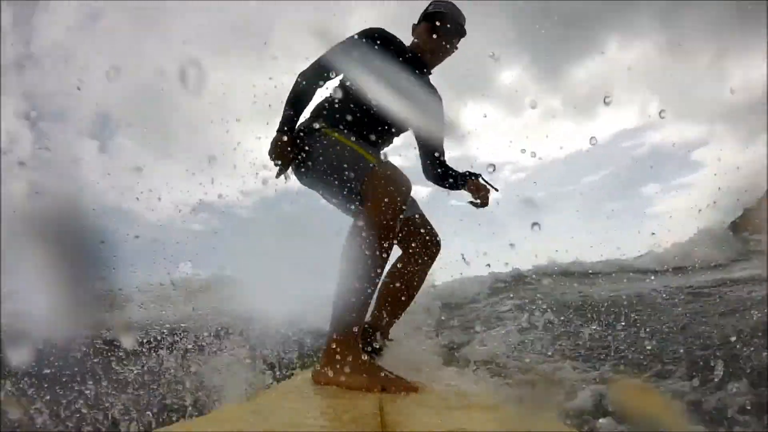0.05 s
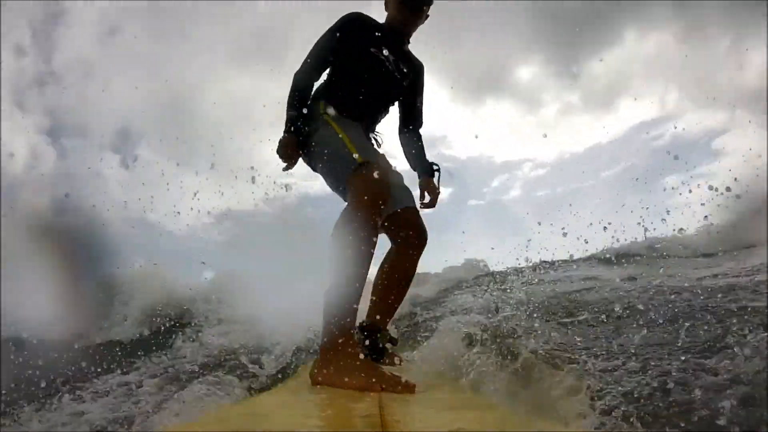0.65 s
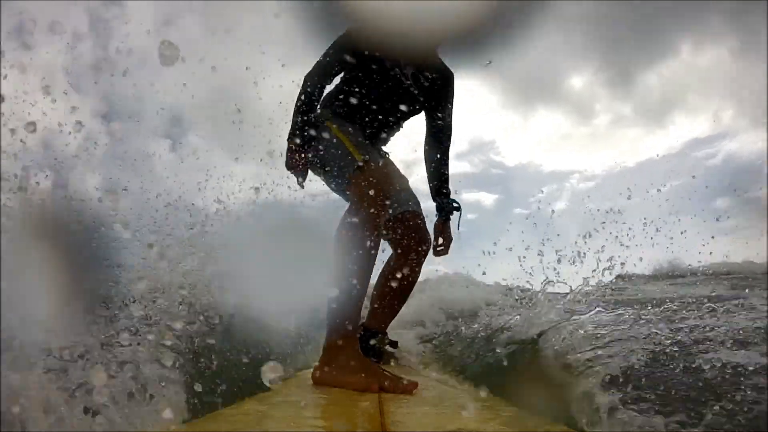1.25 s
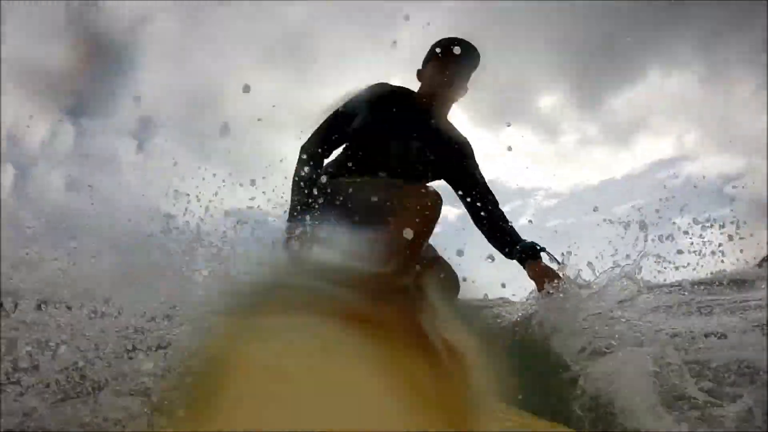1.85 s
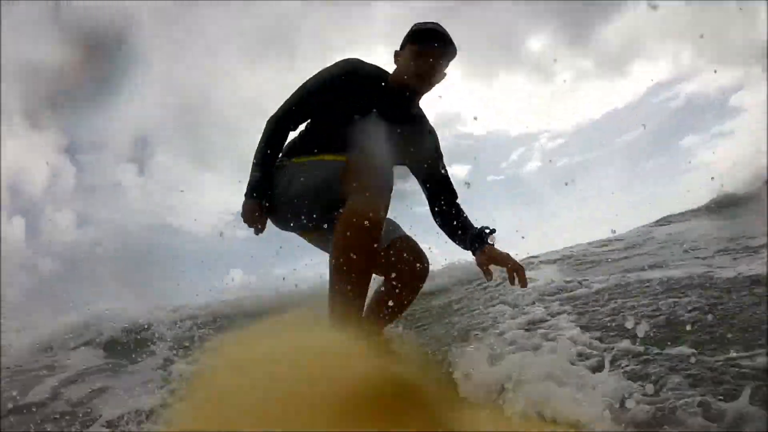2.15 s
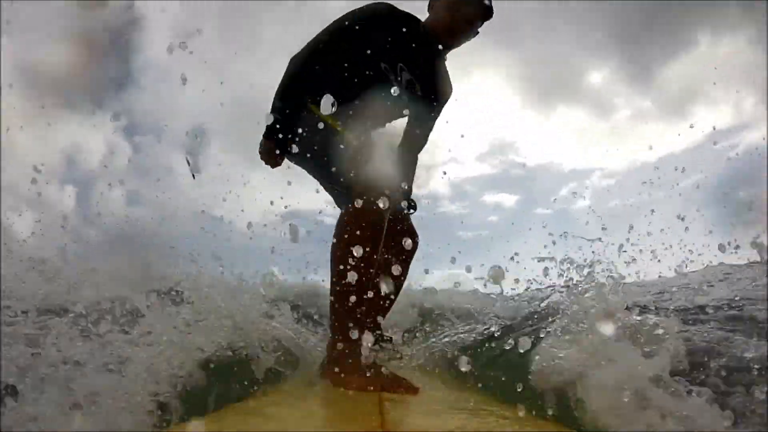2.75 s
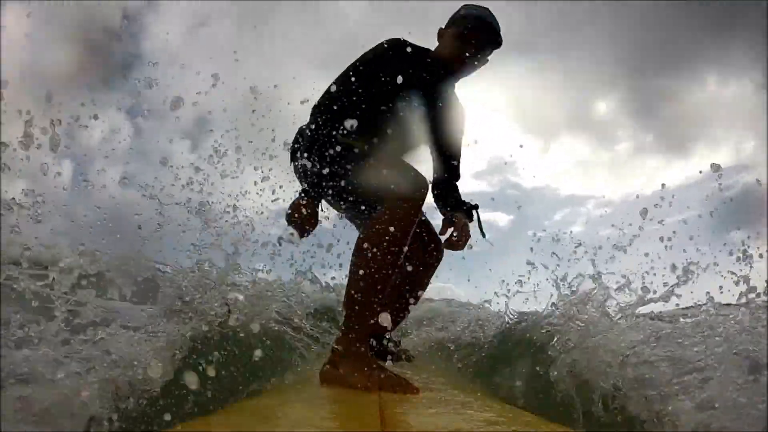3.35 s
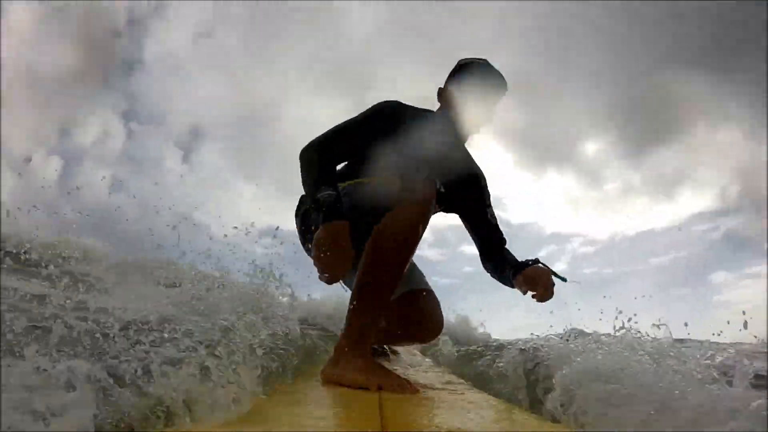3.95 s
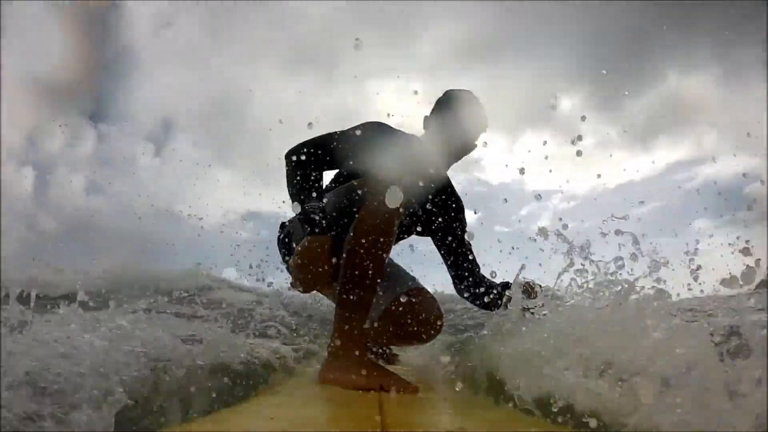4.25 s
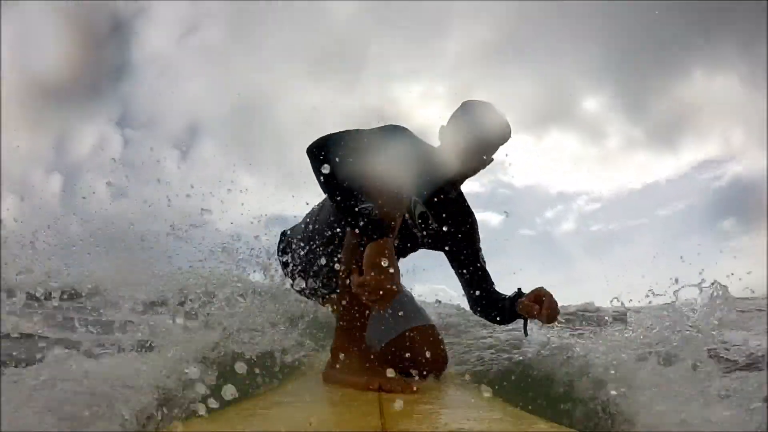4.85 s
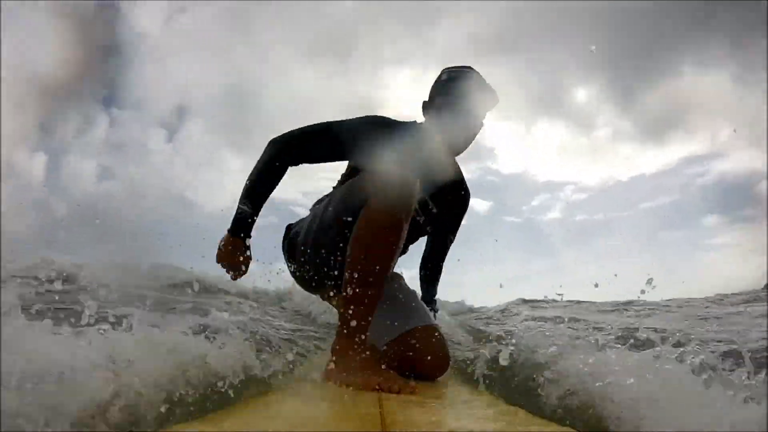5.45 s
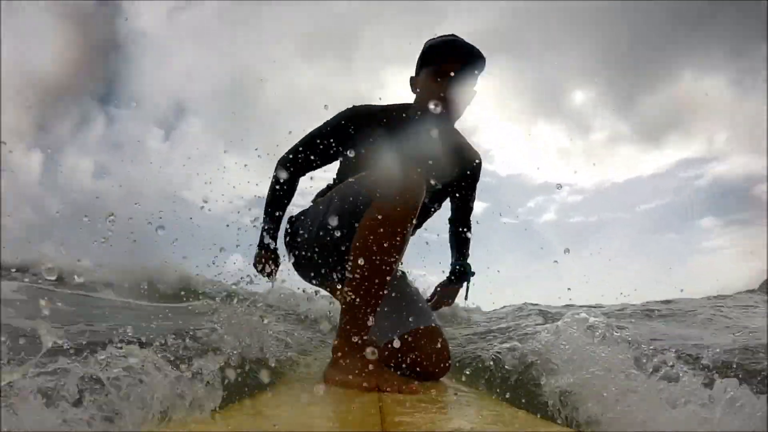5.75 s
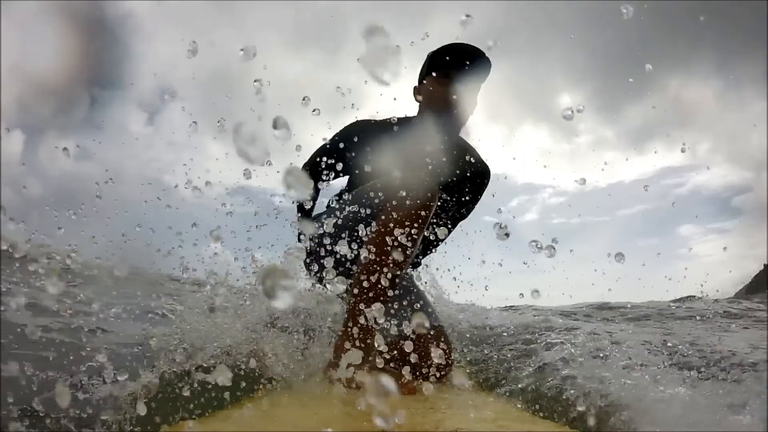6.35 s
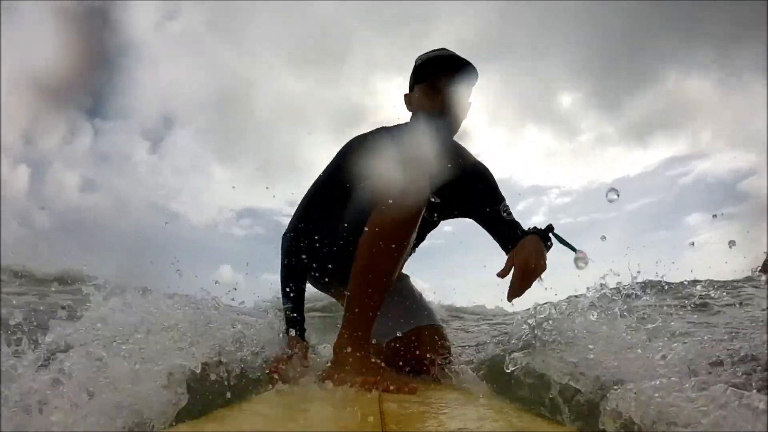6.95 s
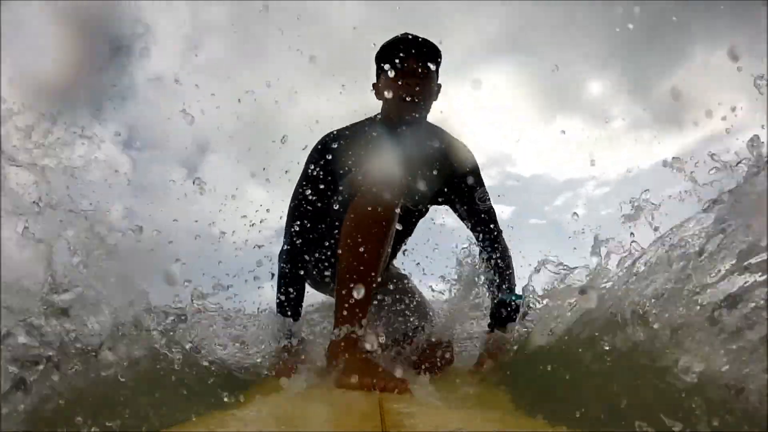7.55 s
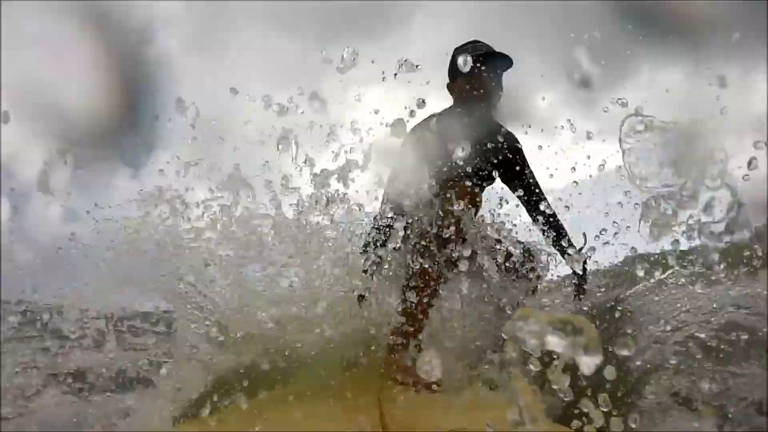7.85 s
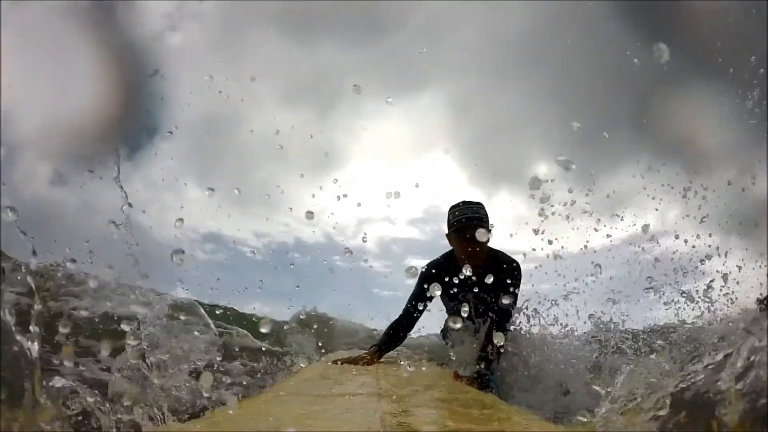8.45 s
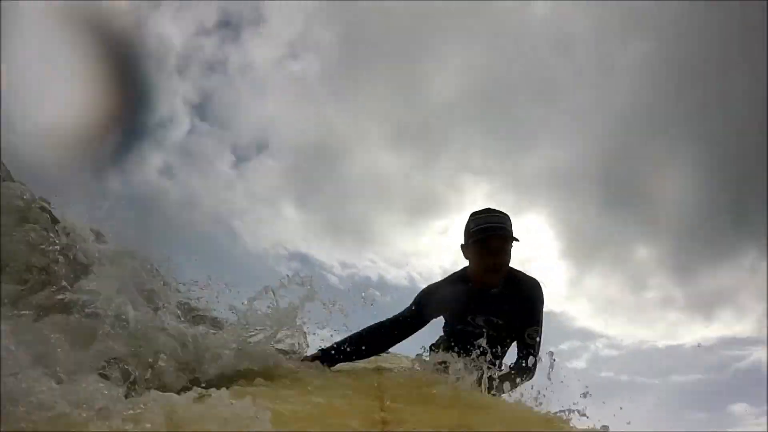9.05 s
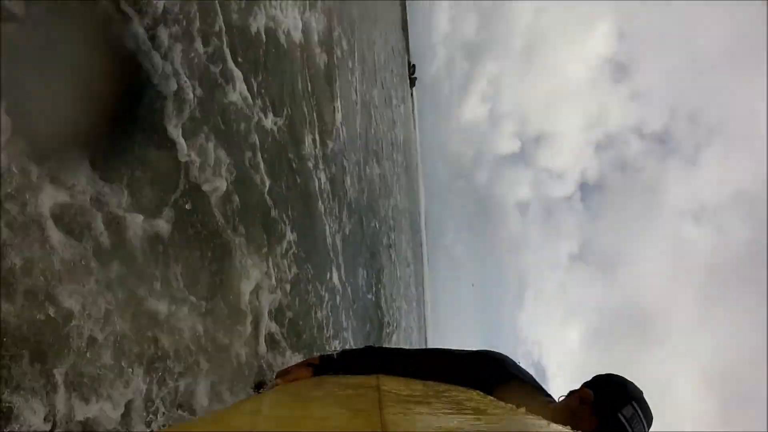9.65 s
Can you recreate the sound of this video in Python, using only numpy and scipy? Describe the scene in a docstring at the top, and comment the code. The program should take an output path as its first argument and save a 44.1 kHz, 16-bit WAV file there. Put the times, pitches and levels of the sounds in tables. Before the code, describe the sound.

Deep wind rumble and uneven booming shake a microphone mounted on the front of a surfboard at sea. Whitewater washes all around, swelling each time the nose digs in, with wet slaps, dull knocks and pattering spray. The surges come closer together from the middle on. Late in the ride, loud drops shower the microphone, a heavy thump follows, and water gurgles at the nose.

```python
"""Surfboard riding whitewater

Heard from a waterproof camera on the board's nose. Each time the nose ploughs in, a bow wave
rushes and churns. Small waves slap the board, and the shaking makes the camera mount boom near
100 Hz. Wind rumbles, spray ticks on the camera case, and now and then a sheet of water thumps the
microphone opening and muffles it. At the end, spray showers the case and water gurgles at the nose."""
import sys
import numpy as np
from scipy import signal
from scipy.fft import rfft, irfft, next_fast_len
from scipy.io import wavfile
from scipy.ndimage import uniform_filter1d

SR = 44100
rng = np.random.default_rng(int(sys.argv[2]) if len(sys.argv) > 2 else 0)


def dump(signal):
    """Clip the signal to [-1, 1] and save it as 16-bit WAV at the path in sys.argv[1]."""
    limited = np.clip(np.atleast_2d(signal).T, -1, 1)
    pcm = np.round(limited * 32767).astype(np.int16)
    wavfile.write(sys.argv[1], SR, pcm)


N = 428652
T = np.arange(N) / SR
TOP_HZ = 15200  # upper edge of the treble


def gain_of(db):
    """Turns decibels into a number to multiply a sound by."""
    return 10 ** (np.asarray(db) / 20)


def unit_rms(x):
    """Scales a signal so that its average strength (rms) is 1."""
    return x / np.sqrt(np.mean(x ** 2) + 1e-20)


def follow(curve, column=1):
    """Joins the dots of one dB column, giving a gain for every sample."""
    rows = np.array(curve)
    return gain_of(np.interp(T, rows[:, 0], rows[:, column]))


def add(mix, start, sound):
    """Mixes a sound in at a start time in seconds."""
    part = mix[max(round(start * SR), 0):][:len(sound)]
    part += sound[:len(part)]


def drift(rate_hz):
    """A random wobble, no faster than about the given rate."""
    hz = np.fft.rfftfreq(N, 1 / SR)
    return unit_rms(irfft(rfft(rng.standard_normal(N)) * np.exp(-(hz / rate_hz) ** 2), N))


def surges(rows, rise_s, fall_s, growth_db=0):
    """Gain for a series of pushes: each builds up, changes by growth_db as it lasts, then dies away."""
    t, power = T[::64], 0
    for start, length, db in rows:
        age = t - start
        fades = np.exp(np.minimum(age, 0) / rise_s - np.maximum(age - length, 0) / fall_s)
        progress = np.clip(age / length, 0, 1)
        power = power + (fades * gain_of(db + growth_db * (progress - 1))) ** 2
    return np.interp(T, t, np.sqrt(power))


def focus(spectrum, centre_hz, slope_db):
    """Turns a spectrum down on both sides of a centre, by slope_db at one octave away."""
    return [(f, db - slope_db * np.log2(f / centre_hz) ** 2) for f, db in spectrum]


# pitches that the camera case boosts or weakens: f/Hz, width/Hz, level/dB
CASE_RESONANCES = [(351.6, 29.2, 8), (388.5, 34, -3.5), (495, 30, 1), (1141, 64, -4.5), (1400, 180, 1),
                   (3830, 83, -1), (4070, 320, 3), (5450, 160, -0.5), (6270, 410, 4.5), (7200, 430, 2)]
def colour(x, spectrum):
    """Gives a sound the tone of a spectrum, as heard through the case, at rms 1."""
    size = next_fast_len(len(x))
    hz = np.fft.rfftfreq(size, 1 / SR)
    points_hz, points_db = np.transpose(spectrum)
    tone_db = np.interp(np.log(hz + 1), np.log(points_hz), points_db)
    case_db = sum(db * np.exp(-.5 * ((hz - f) / width) ** 2) for f, width, db in CASE_RESONANCES)
    return unit_rms(irfft(rfft(x, size) * gain_of(tone_db + case_db), size)[:len(x)])


def rumble(spectrum, force, settle_s, steadiness):
    """Deep noise, evened out so that its loudness keeps close to the force driving it."""
    noise = colour(rng.standard_normal(N), spectrum)
    power = uniform_filter1d(abs(signal.hilbert(noise)) ** 2, size=int(settle_s * SR))
    return unit_rms(noise / (power + 0.039) ** (steadiness / 2)) * force


# air flowing over the moving camera: t/s, level/dB
AIRFLOW = [(0.0, -26.5), (1.43, -27.5), (2.0, -32), (2.54, -21), (2.71, -28.5), (3.19, -23), (3.65, -32.5),
           (4.11, -24), (5.25, -33.5), (5.49, -28), (7.23, -28), (7.58, -31), (8.28, -27.5), (8.47, -37),
           (9.12, -31.5), (9.37, -31), (9.72, -25.5)]
# gusts across the microphone opening: t/s, length/s, level/dB
WIND_GUSTS = [(0.27, 0.29, -29.5), (0.96, 0.099, -21.5), (1.52, .11, -25.5), (2.34, .13, -21.5),
              (2.95, .1, -25), (3.84, 0.17, -19.5), (4.6, 0.068, -26), (8.08, 0.36, -38), (8.82, .03, -31),
              (9.45, 0.34, -31.5)]
# tone of the wind: f/Hz, level/dB
WIND_TONE = [(10, -26), (22, -15.5), (38, -1.5), (55, 0.5), (70, 3.5), (110, -14), (300, -44.5),
             (1500, -92.5)]
def wind(airflow_db=-6, swirl_db=5.2):
    """Moving air rumbles in the microphone opening, swelling with every swirl and gust."""
    swirls = gain_of(airflow_db + swirl_db * drift(rate_hz=7.5)) * follow(AIRFLOW)
    gusts = surges(WIND_GUSTS, rise_s=0.012, fall_s=0.035)
    return rumble(WIND_TONE, np.hypot(gusts, swirls), settle_s=0.098, steadiness=0.92)


def bubbles(low_hz, high_hz, per_s, cycles, spread_db, pitches=17):
    """A swarm of bubbles: each rings, rises a little in pitch and dies away."""
    out = np.zeros(N)
    for hz in np.geomspace(low_hz, high_hz, pitches):
        progress = np.linspace(0, 1, int(cycles * SR / hz) + 8)
        envelope = np.exp(-4.5 * progress) * (1 - np.exp(-25 * progress))
        ring = np.sin(2 * np.pi * cycles * (progress + 0.1 * progress ** 2)) * envelope
        when, size, lottery = rng.random((900, 3)).T
        born = lottery < per_s * N / SR / pitches / len(lottery)
        strength = gain_of(spread_db * np.minimum(-np.log(1 - size), 3.5))  # a few are much louder
        births = np.bincount((when[born] * N).astype(int), strength[born], N)
        out += signal.oaconvolve(births, ring)[:N]
    return unit_rms(out)


# the foaming sea all around, also heard in whitewater(): t/s, wash level/dB, foam level/dB
BROKEN_SEA = [(0.0, -39.5, -55.5), (0.24, -40.5, -55.5), (1.87, -41, -57.5), (3.14, -38.5, -56.5),
              (3.74, -43.5, -58.5), (4.09, -43, -72), (4.22, -40.5, -51), (4.55, -49, -60.5),
              (6.09, -36.5, -53), (6.36, -42.5, -53.5), (6.98, -37.5, -57), (7.28, -39.5, -53),
              (7.47, -48, -59), (8.28, -37, -49), (8.47, -41.5, -54.5), (9.18, -42, -57), (9.72, -51, -55)]
def droplets(level_db=-20):
    """Stray droplets thrown up by the foam tick on the case all the time."""
    ticks = bubbles(6000, 14000, per_s=60, cycles=11, spread_db=1.5)
    tone = [(3000, -9), (6500, -11), (8500, -11), (13000, -13.5)]
    return gain_of(level_db) * colour(ticks, tone) * follow(BROKEN_SEA, column=2)


# single drops hitting the case: t/s, peak level/dB, f/Hz
DROP_HITS = [(0.7607, -50, 8770), (0.818, -44, 8300), (1.4457, -44, 8400), (1.4684, -41.5, 8400),
             (1.5319, -43, 12700), (1.8973, -44, 8800), (3.3286, -33, 4150), (3.4988, -50, 13510),
             (3.5828, -43, 7860), (4.6109, -41, 5400), (5.2794, -30.5, 7800), (5.4043, -37, 8760),
             (5.9514, -23, 1890), (6.379, -23.5, 2230), (7.75, -32.5, 6100), (7.8276, -29, 7900),
             (7.864, -22, 7200), (7.882, -24, 4560), (8.634, -12, 1990), (8.6427, -9, 2120),
             (8.6472, -10.5, 1950), (8.6607, -13, 1930), (8.766, -18, 4570), (8.9563, -46.6, 8700),
             (9.1049, -52, 9110), (9.3967, -38, 9900), (9.4242, -45, 9050)]
def drops(ring_s=0.0013, rise_s=0.00022, splash=0.61):
    """A drop pings on the case and scatters in a tiny splash around the same pitch."""
    out, t = np.zeros(N), np.arange(800) / SR
    envelope = np.exp(-t / ring_s) * (1 - np.exp(-(t / rise_s) ** 2))
    for start, db, hz in DROP_HITS:
        tone = [(hz / 10, -50), (hz / 2, -20), (hz, 0), (hz * 2, -22), (hz * 10, -65)]
        scatter = colour(rng.standard_normal(len(t)), tone)
        ping = (np.sin(2 * np.pi * hz * t) + splash * scatter) * envelope
        add(out, start, gain_of(db) * ping / abs(ping).max())
    return out


# spray landing on the case: t/s, length/s, level/dB, centre f/Hz, drops per second
SPRAY_SHOWERS = [(1.124, 0.064, -36.5, 2460, 5700), (3.292, .09, -40.5, 2930, 17000),
                 (4.111, 0.05, -37.5, 3120, 12000), (6.767, 0.046, -41, 2900, 10000),
                 (7.32, .06, -38, 2800, 9100), (7.79, 0.16, -42, 6240, 1100),
                 (7.901, 1.34, -59.5, 5670, 880), (8.645, 0.13, -27, 2320, 12800),
                 (8.653, 0.11, -48.5, 10400, 10000), (8.738, 0.11, -41, 4630, 1500),
                 (9.371, 0.065, -44.5, 7600, 2300)]
# tone of the spray: f/Hz, level/dB
SPRAY_TONE = [(200, 34.5), (1300, 3), (2300, 3), (3600, -7), (7500, -18), (9000, -29), (12000, -18),
              (15000, -35)]
def showers(spread_db=3, rise_s=0.000069, tick_s=0.00025):
    """A cloud of drops sweeps over the case, swelling and fading; each ticks at its own pitch."""
    out, t = np.zeros(N), np.arange(200) / SR
    envelope = np.exp(-t / tick_s) * (1 - np.exp(-t / rise_s))
    for start, length, db, hz, per_s in SPRAY_SHOWERS:
        when, size, pitch = rng.random((2048, 3))[:int(per_s * length)].T[:, :, None]
        strength = np.sin(np.pi * when) * gain_of(spread_db * np.minimum(-np.log(1 - size), 3))
        ticks = strength * np.sin(2 * np.pi * pitch * TOP_HZ * t) * envelope
        samples = ((when * length + t) * SR + .5).astype(int)
        patter = np.bincount(samples.ravel(), ticks.ravel())
        add(out, start, gain_of(db) * colour(patter, focus(SPRAY_TONE, hz, slope_db=3.5)))
    return out


# pockets of air ringing under the nose: t/s, length/s, level/dB, f/Hz
AIR_POCKETS = [(1.398, 0.036, -28, 913), (1.417, 0.012, -19.5, 500), (1.865, 0.028, -42, 353),
               (2.614, 0.009, -17, 1690), (2.871, 0.074, -30, 955), (2.95, 0.043, -29.5, 413),
               (4.445, 0.0046, -23.5, 1970), (4.474, 0.0074, -25, 1540), (6.116, 0.015, -17, 2110),
               (6.466, 0.013, -19, 1266), (7.352, 0.043, -24, 240), (7.607, 0.051, -28.5, 254),
               (7.722, 0.012, -22.5, 933), (7.932, 0.059, -26.5, 685), (8.353, 0.074, -28.5, 226),
               (9.033, 0.027, -28.5, 720), (9.034, 0.027, -23.5, 1410), (9.085, 0.077, -33.5, 516),
               (9.161, 0.035, -42, 880), (9.24, 0.15, -28.5, 513), (9.343, 0.05, -27, 750),
               (9.524, 0.013, -22, 597)]
def gurgles(level_db=-1, glide=0.035, wobble=0.06, rough_db=4.5):
    """Trapped air sings a short, ragged note that rises as it nears the surface."""
    out = np.zeros(N)
    waver = drift(rate_hz=450)
    shudder = gain_of(rough_db * drift(rate_hz=710))
    for start, length, db, hz in AIR_POCKETS:
        progress = np.linspace(0, 1, int(length * SR))
        samples = int(start * SR) + np.arange(len(progress))
        pitch = hz * (1 + glide * progress + wobble * waver[samples])
        swell = np.sin(np.pi * progress ** 0.5) ** 2 * unit_rms(shudder[samples])
        add(out, start, gain_of(db + level_db) * swell * np.sin(2 * np.pi * np.cumsum(pitch) / SR))
    return out


# small waves slapping the nose: t/s, length/s, level/dB, centre f/Hz
WAVE_SLAPS = [(0.364, 0.021, -26.5, 1000), (0.424, 0.025, -26, 1440), (0.995, 0.026, -23.5, 1190),
              (1.383, 0.046, -25.5, 1010), (1.506, 0.02, -26.5, 1160), (1.527, 0.027, -32, 860),
              (1.674, 0.036, -35, 1260), (1.866, 0.029, -34.5, 840), (2.272, 0.0061, -22.5, 1010),
              (2.283, 0.028, -23, 885), (2.352, 0.02, -24.5, 1000), (2.414, 0.015, -30.5, 1190),
              (2.452, 0.02, -26, 1190), (2.501, 0.019, -30, 1290), (2.957, 0.017, -28.5, 780),
              (3.283, 0.021, -22.5, 1430), (3.354, 0.016, -25, 1220), (3.7, 0.013, -30, 1030),
              (5.838, 0.028, -27.5, 1430), (6.159, 0.016, -29.5, 1570), (6.244, 0.013, -25.5, 1200),
              (6.708, 0.018, -31, 1060), (6.818, 0.01, -24.5, 1210), (7.329, 0.023, -24, 1310),
              (7.434, 0.015, -18, 1030), (7.722, 0.0095, -32, 1050), (7.835, 0.0047, -27, 1350),
              (7.934, 0.011, -23, 1110), (8.299, 0.034, -25, 1480), (8.353, 0.017, -26, 1370),
              (8.806, 0.02, -27, 516), (9.029, 0.0094, -33, 1290), (9.378, 0.029, -32, 1330),
              (9.516, 0.0041, -31.5, 940), (9.524, 0.025, -35, 810), (9.647, 0.031, -33.5, 1070)]
# tone of a slap: f/Hz, level/dB
SLAP_TONE = [(100, -18.5), (280, 2.5), (600, -4.5), (1400, -5), (2200, -5.5), (3200, -14), (5000, -21.5),
             (8000, -22), (15000, -63.5)]
def slaps(level_db=-1, rise_s=0.0012, stop_s=0.0018, grain_db=3, wet_db=-13, wet_s=0.022):
    """A slap is a tight bunch of tiny hits that stops quickly and leaves a short, wet tail."""
    out, t = np.zeros(N), np.arange(4096) / SR
    for start, length, db, hz in WAVE_SLAPS:
        noise, sizes = rng.standard_normal((2, len(t)))
        hits = noise * gain_of(grain_db * np.repeat(sizes[::64], 64))
        burst = colour(hits, focus(SLAP_TONE, hz, slope_db=4.5))
        after = np.maximum(t - length, 0)
        tail = np.maximum(np.exp(-after / stop_s), gain_of(wet_db) * np.exp(-after / wet_s))
        burst *= np.minimum(t / rise_s, 1) * tail
        burst /= np.std(burst[:int(length * SR) + 60])
        add(out, start - rise_s / 2, gain_of(db + level_db) * burst)
    return out


# water covering the microphone: t/s, thump level/dB, thump f/Hz, length/s, muffling/dB
WATER_SHEETS = [(1.715, -28, 88, .11, 6.5), (4.608, -8, 97, 0.091, 9.5), (7.45, -12.5, 90, .26, 1.5),
                (8.831, -11, 107, 0.27, 0)]
def wet_microphone(sound):
    """A sheet of water thumps the opening and can turn the given sound down until it drains."""
    thumps, loss_db = np.zeros(N), np.zeros(N)
    t = np.arange(-1024, 1024) / SR
    for start, db, hz, length, muffle_db in WATER_SHEETS:
        push = (np.pi * hz * t) ** 2
        add(thumps, start + t[0], -gain_of(db) * (1 - 2 * push) * np.exp(-push))
        covered = np.interp(T - start, [.003, .007, 0.69 * length, 1.21 * length], [0, 1, 1, 0])
        loss_db += muffle_db * covered
    return thumps + sound * gain_of(-loss_db)


# the hardest bumps from waves below: t/s, length/s, level/dB, f/Hz
HARD_BUMPS = [(0.385, 0.023, -7, 101), (0.986, 0.021, -10.5, 97), (1.466, 0.069, -8.5, 99),
              (1.55, 0.052, -11.5, 91), (2.328, 0.011, -8.5, 92), (2.525, 0.052, -12, 99),
              (3.319, 0.015, -8.5, 95), (3.843, 0.0061, -7, 83.5), (4.347, 0.041, -16, 102),
              (4.542, 0.043, -13.5, 90), (4.999, 0.013, -8.5, 108), (5.473, 0.027, -11, 101),
              (6.005, 0.061, -11.5, 93), (6.35, 0.045, -21, 96), (6.836, 0.025, -7.5, 116),
              (7.198, 0.043, -8.5, 97.3), (7.862, 0.033, -13, 99), (8.323, 0.021, -7, 121),
              (9.482, 0.022, -9.5, 93), (9.682, .045, -15, 111)]
def knocks(level_db=-1, swell=5.3, fade=5.0, sag=0.043):
    """A bump swings the camera mount briefly, the pitch sagging as the push lets go."""
    out = np.zeros(N)
    for (peak_time, length, db, hz), phase in zip(HARD_BUMPS, rng.random(len(HARD_BUMPS))):
        from_peak = np.arange(-2 * length, 2 * length, 1 / SR) / length
        swing = np.sin(2 * np.pi * (phase + hz * length * (from_peak - sag * from_peak ** 2)))
        envelope = np.exp(-np.where(from_peak < 0, swell, fade) * from_peak ** 2)
        add(out, peak_time - 2 * length, gain_of(db + level_db) * swing * envelope)
    return out


# the nose digging into the water: t/s, length/s, rush level/dB, churn level/dB, shake level/dB
NOSE_PLUNGES = [(0.252, .22, -31, -33.5, -20), (0.933, 0.2, -31.5, -32.5, -20.5),
                (1.39, 0.19, -58, -45, -24.5), (1.682, 0.031, -35.5, -36.5, -14),
                (1.988, .17, -42.5, -41, -27), (2.32, 0.35, -38, -43, -22.5), (2.86, 0.21, -45, -39, -28.5),
                (3.019, 0.072, -30, -37.5, -23.5), (3.197, 0.17, -31.5, -33, -24.5),
                (3.412, 0.063, -38, -49, -23.5), (3.826, .17, -30.5, -32, -21),
                (4.043, 0.2, -27, -32, -22.5), (4.474, 0.083, -27, -30.5, -30),
                (4.731, 0.052, -34.5, -39.5, -30), (4.827, 0.19, -35, -42.5, -31),
                (4.948, 0.13, -33.5, -36.5, -27), (5.28, 0.13, -30.5, -37, -26),
                (5.439, 0.093, -29, -31, -23), (5.672, 0.05, -32, -33.5, -24.5),
                (5.807, .11, -30, -33, -19.5), (5.953, 0.059, -28.5, -32, -22.5),
                (6.117, 0.17, -29, -35, -22), (6.424, 0.059, -34, -47, -33),
                (6.584, 0.11, -31, -35.5, -24.5), (6.707, 0.11, -28, -30.5, -24),
                (6.903, 0.043, -27.5, -33.5, -25), (7.029, 0.082, -29, -33, -21),
                (7.144, 0.078, -28, -34, -25.5), (7.337, 0.032, -29, -31, -23.5),
                (7.728, 0.22, -35, -34.5, -31.5), (8.097, 0.074, -36.5, -37.5, -19.5),
                (8.171, 0.27, -31.5, -35, -26), (9.01, 0.092, -38, -57, -48),
                (9.156, 0.31, -43.5, -41, -26.5)]
def plunges(column, rise_s=0.014, fall_s=0.026, growth_db=-0.5):
    """Gain from one level column: it builds as the nose digs in and falls as the wave collapses."""
    return surges([(row[0], row[1], row[column]) for row in NOSE_PLUNGES], rise_s, fall_s, growth_db)


# tone of the shaking camera mount: f/Hz, level/dB
MOUNT_TONE = [(25, -22.5), (55, -21), (72, -8.5), (88, -1), (103, 1), (122, -5), (150, -18), (200, -26.5),
              (280, -50), (600, -77), (2000, -91)]
def mount_boom(airflow_db=-1, judder_db=2):
    """The camera mount trembles in the airflow and booms in uneven jolts through every plunge."""
    shake = plunges(column=4, rise_s=0.0081, fall_s=0.02)
    force = np.hypot(shake, gain_of(airflow_db) * follow(AIRFLOW))
    judder = unit_rms(gain_of(judder_db * drift(rate_hz=39)))
    return rumble(MOUNT_TONE, force * judder, settle_s=0.027, steadiness=0.56)


def froth(patchy_db):
    """Clouds of bubbles born together: noise in patches about 15 ms long and 400 Hz wide."""
    grid = signal.stft(rng.standard_normal(N), nperseg=512, noverlap=384)[2]
    patches = uniform_filter1d(rng.standard_normal(grid.shape), size=5, axis=0)  # blur across pitch
    patches = uniform_filter1d(patches, size=6, axis=1)  # blur across time
    grid *= gain_of(patchy_db * unit_rms(patches))
    return unit_rms(signal.istft(grid, nperseg=512, noverlap=384)[1][:N])


# tones of the water, from tiny foam bubbles to big air pockets dragged under: f/Hz, level/dB
FOAM_TONE = [(1200, -8), (2600, 5.5), (3400, -1.5), (4600, 1), (5400, -7), (6500, -11.5), (7500, -14.5),
             (8600, -23), (12300, -19.5), (13500, -30.5), (15000, -36.5)]
RUSH_TONE = [(300, -10), (900, -8.5), (1200, -4), (1450, 0), (2100, -0.5), (2600, -8), (3300, -16.5),
             (5000, -37), (8000, -54.5), (15000, -73)]
CHURN_TONE = [(120, -16), (230, -1.5), (330, -5.5), (600, 2.5), (950, -0.5), (1300, 2.5), (2200, -22.5),
              (5000, -61)]
GLUG_TONE = [(90, -21), (150, -0.5), (190, -2), (250, -7), (330, 0.5), (420, -13), (900, -35)]
def whitewater(flicker_db=1.5, heave_db=0.7):
    """Froth and bubbles wash all around and swell into a bow wave, fluttering as the water tears."""
    flutter = unit_rms(gain_of(flicker_db * drift(rate_hz=27) + heave_db * drift(rate_hz=16)))
    rush = froth(patchy_db=2) + 0.3024 * bubbles(1006, 3480, per_s=650, cycles=13.4, spread_db=3.5)
    churn = froth(patchy_db=1.5) + 0.28 * bubbles(275, 1033, per_s=200, cycles=9.1, spread_db=2.5)
    foam = rng.standard_normal(N) + 0.2 * bubbles(2820, 7500, per_s=700, cycles=23, spread_db=2.8)
    glug = bubbles(130, 357, per_s=200, cycles=8, spread_db=0.5)
    # during a plunge the bright rush grows while the low churn eases
    bright, low = plunges(column=2, growth_db=2), plunges(column=3)
    wash, fizz = follow(BROKEN_SEA, column=1), follow(BROKEN_SEA, column=2)
    # hypot adds two gains by their power, the way separate noises add up
    rush = colour(rush, RUSH_TONE) * np.hypot(bright, gain_of(-1) * wash)
    churn = colour(churn, CHURN_TONE) * np.hypot(gain_of(-3) * low, gain_of(-4) * wash)
    foam = colour(foam, FOAM_TONE) * np.hypot(gain_of(-24) * bright, fizz)
    glug = colour(glug, GLUG_TONE) * gain_of(-9) * low
    return flutter * (rush + churn + glug) + foam


def scene():
    """Water and the booming mount pass through the wet microphone; spray, knocks and wind go on top."""
    muffled = wet_microphone(whitewater() + slaps() + gurgles() + droplets() + mount_boom())
    return (muffled + showers() + drops() + knocks() + wind())[None]


def record(dry, ceiling=0.63):
    """The microphone rounds off the biggest swings, then the highest treble is cut."""
    rounded = dry / (1 + (dry / ceiling) ** 6) ** (1 / 6)
    lowpass = signal.firwin(255, TOP_HZ, window=("kaiser", 9), fs=SR)
    return signal.oaconvolve(rounded, lowpass[None], "same")


dry = scene()
out = record(dry)
dump(out)
```